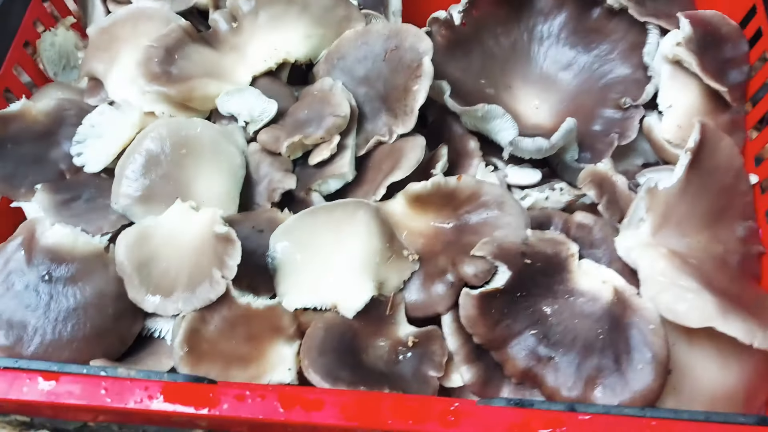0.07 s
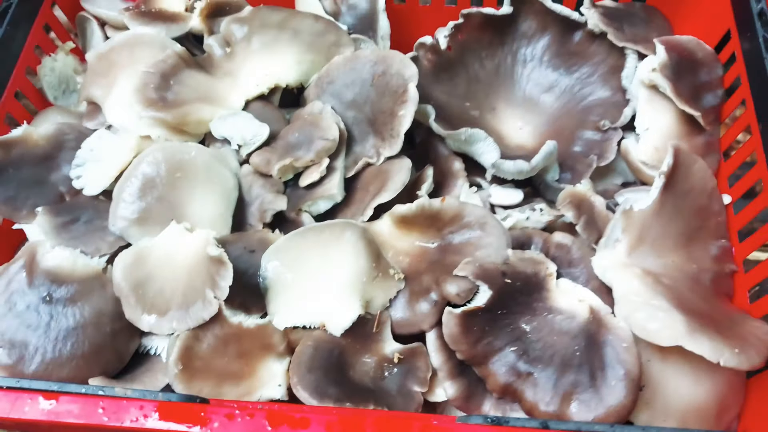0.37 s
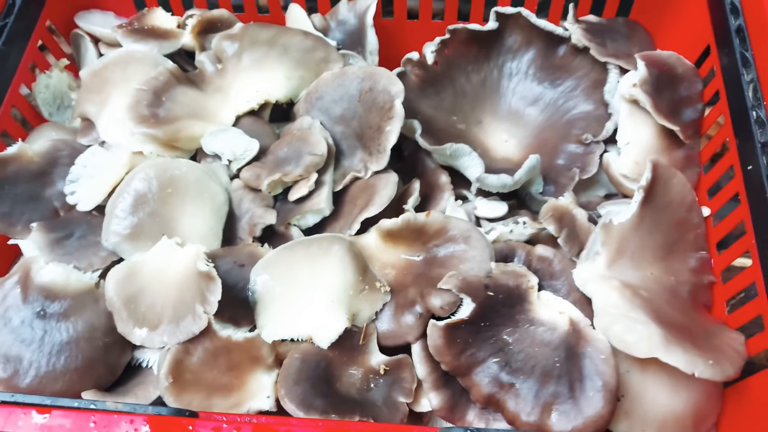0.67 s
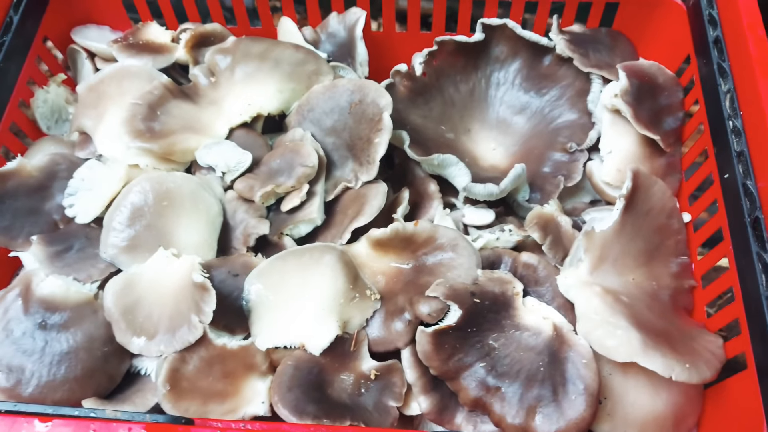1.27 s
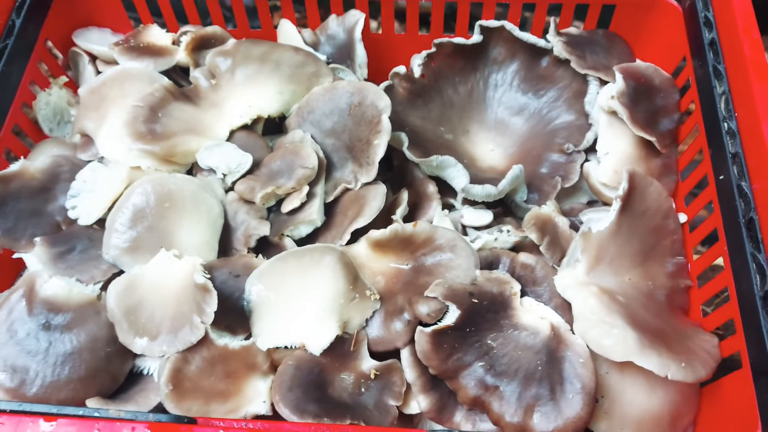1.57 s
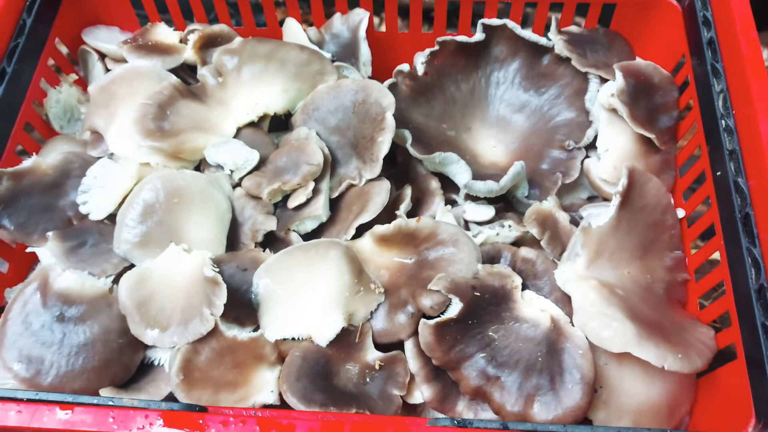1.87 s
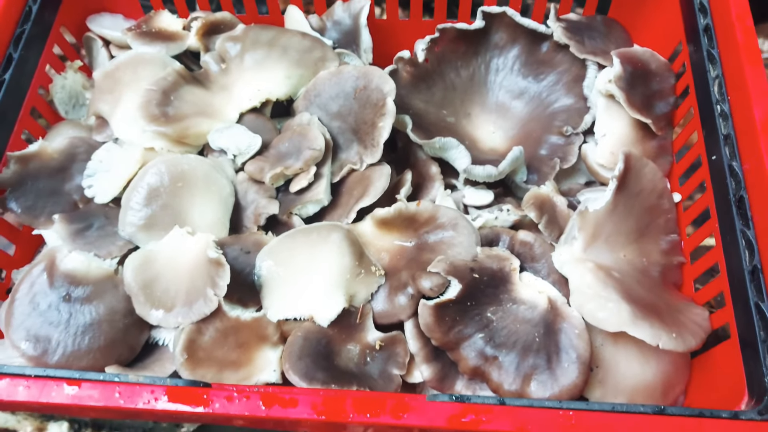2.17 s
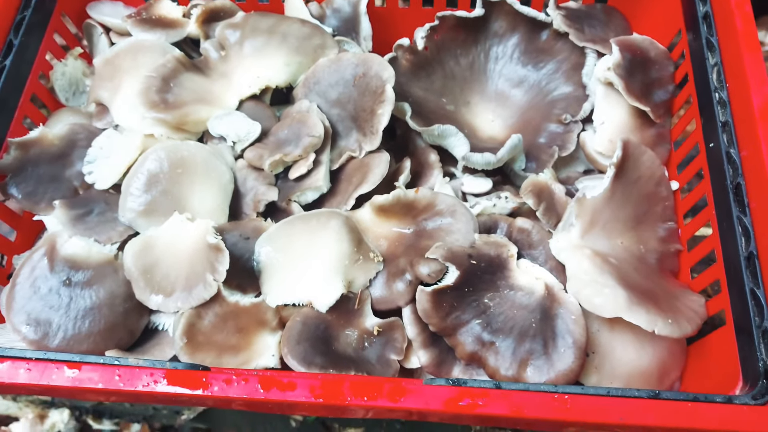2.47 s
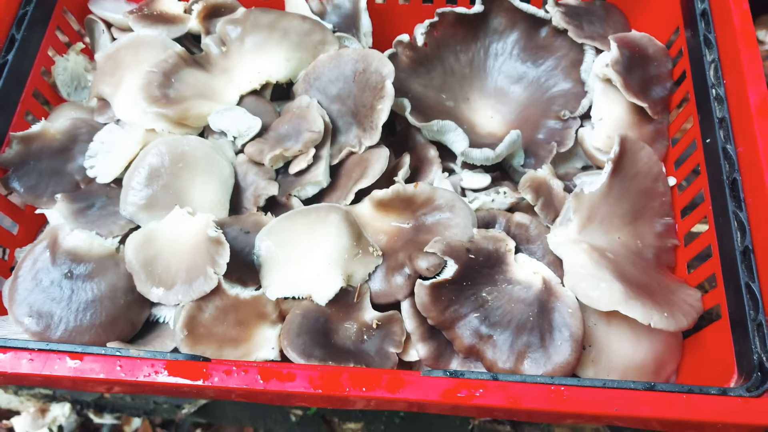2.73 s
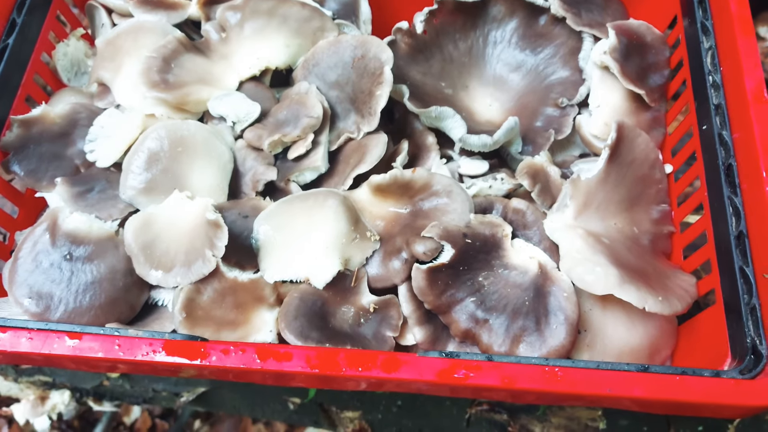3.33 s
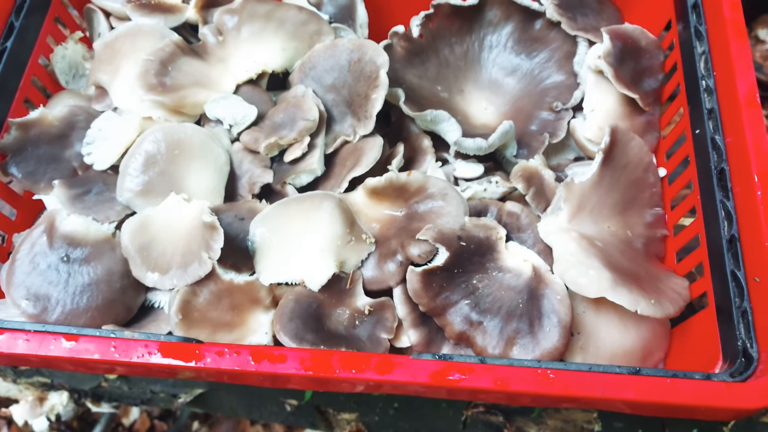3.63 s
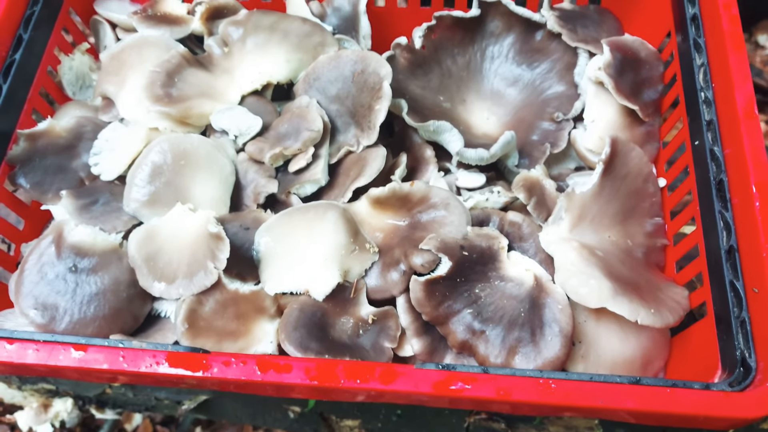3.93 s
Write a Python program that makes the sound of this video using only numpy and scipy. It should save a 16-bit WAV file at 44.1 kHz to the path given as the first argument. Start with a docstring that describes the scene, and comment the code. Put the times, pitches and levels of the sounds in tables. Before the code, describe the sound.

Wind buffeting the microphone over soft light rain, with a few ticks and crate taps.

```python
"""Light rain over a plastic crate

Outdoors, a stereo microphone close over a plastic crate. Countless drops on the leaves all round
merge into a soft hiss, and a breeze buffets both ports with rumble and dull bumps, over a faint
far-off drone. Nearby come sharp ticks on the right, three hollow taps that ring the crate,
faint drips pinging on leaves and, near the end, one short rustle."""
import sys
import numpy as np
from scipy.fft import rfft, irfft, next_fast_len
from scipy.io import wavfile
from scipy.ndimage import uniform_filter1d, map_coordinates

SR = 44100
rng = np.random.default_rng(int(sys.argv[2]) if len(sys.argv) > 2 else 0)


def generate_wav(signal):
    """Clip the signal to [-1, 1] and save it as 16-bit WAV at the path in sys.argv[1]."""
    frames = np.transpose(np.atleast_2d(signal))
    scaled = np.clip(frames, -1, 1) * 32767
    pcm = np.round(scaled).astype(np.int16)
    wavfile.write(sys.argv[1], SR, pcm)


N = 4 * SR


def amp(db):
    """Decibels to gain."""
    return 10 ** (np.asarray(db) / 20)


def unit(x):
    """Scale each channel to rms 1."""
    return x / np.sqrt(np.mean(x ** 2, axis=-1, keepdims=True) + 1e-20)


def curve(rows):
    """Join (time_s, value) points into one value per sample."""
    return np.interp(np.arange(N) / SR, *np.transpose(rows))


def wobble(rate):
    """A smooth random curve with rate knots a second."""
    knots = rng.standard_normal(int(N * rate / SR) + 4)
    return map_coordinates(knots, [np.arange(N) * rate / SR])


def filtered(x, response):
    """Filter x by response(hz)."""
    n = x.shape[-1]
    padded = next_fast_len(n + 8192)
    return irfft(rfft(x, padded) * response(np.fft.rfftfreq(padded, 1 / SR)), padded)[..., :n]


def coloured(x, spectrum):
    """Shape x by (frequency_hz, gain_db) points and scale to rms 1."""
    freqs, db = np.transpose(spectrum)
    return unit(filtered(x, lambda hz: amp(np.interp(np.log(hz + 1), np.log(freqs + 1), db))))


def fade(t, t60):
    """Exponential decay, 60 dB in t60 seconds."""
    return amp(-60 * t / t60)


def add(out, start_s, sound):
    """Mix a sound in at start_s."""
    part = out[..., round(start_s * SR):][..., :sound.shape[-1]]
    part += sound[..., :part.shape[-1]]


def breeze():
    """Each port rumbles with its own gusts; the stronger the gust, the more small eddies."""
    # gust strength at each port: time_s, level_db
    gust_left = [(0.0, -39.5), (0.12, -29.5), (0.4, -44), (0.48, -36), (0.68, -48.5), (0.84, -42),
                 (1.14, -41), (1.22, -44), (1.42, -44), (1.8, -52), (2.02, -46.5), (2.08, -55),
                 (2.28, -43.5), (2.62, -47.5), (2.66, -68), (2.8, -43), (3.04, -46.5), (3.2, -35),
                 (3.26, -49), (3.38, -39), (3.64, -46), (3.99, -39)]
    gust_right = [(0.0, -35), (0.24, -29.5), (0.38, -40.5), (0.52, -32.5), (0.58, -45), (0.72, -37),
                  (0.82, -48.5), (0.88, -38), (0.93, -47.5), (0.97, -34.5), (1.4, -41.5), (1.6, -37.5),
                  (1.64, -50), (1.68, -53), (1.74, -31.5), (1.81, -49), (2.04, -40), (2.095, -53),
                  (2.12, -30), (2.24, -35), (2.265, -42), (2.285, -31.5), (2.42, -37.5), (2.54, -54),
                  (2.6, -36), (2.7, -46.5), (2.74, -33.5), (2.86, -48), (2.9, -36.5), (3.0, -40.5),
                  (3.08, -34), (3.14, -34.5), (3.34, -32), (3.74, -44.5), (3.82, -35), (3.99, -39)]
    # buffeting spectrum: frequency_hz, gain_db
    buffet = [(18, -22), (28, -48), (45, -4.5), (68, 3), (100, -4), (135, -10), (190, -18.5), (240, -27.5),
              (290, -24), (400, -41.5), (700, -54), (1200, -120)]
    eddy_hz, eddy_exponent = 184, 1.35
    gust = amp([curve(gust_left), curve(gust_right)])
    gust_rms = np.sqrt(np.mean(gust ** 2, axis=1, keepdims=True))
    air = coloured(rng.standard_normal((2, N)) + 0.018 * rng.standard_normal(N), buffet)
    power = np.abs(uniform_filter1d(air ** 2, size=2200, axis=-1))
    air = air / np.sqrt(power + 1e-6)  # evened out, so the gusts set the level
    low = filtered(air, lambda hz: 1 / (1 + (hz / eddy_hz) ** 6))
    flutter = amp(0.61 * np.array([wobble(59), wobble(45)]))
    eddies = unit(gust ** eddy_exponent * flutter) * gust_rms  # swing wider than the gusts
    return amp(2) * gust * low + amp([[4], [-3]]) * eddies * (air - low)


def drone():
    """A faint, steady low background from far away."""
    # distant background: frequency_hz, gain_db
    spectrum = [(150, -2.5), (230, -6.5), (285, -1.5), (340, -5.5), (480, -10.5), (650, -12.5), (1000, -67)]
    noise = rng.standard_normal((2, N)) + rng.standard_normal(N)
    return amp(-58.5) * coloured(noise, spectrum + [(2000, -120)])


def rain():
    """Countless far drops merge into hiss; nearer ones add a fine patter."""
    # rain strength: time_s, level_db
    strength = [(0.0, -57.5), (0.22, -57.5), (0.42, -58), (0.7, -58.5), (0.8, -59), (1.1, -57.5),
                (1.4, -58.5), (1.6, -57), (1.67, -59.5), (2.05, -59.5), (2.2, -58), (2.46, -58),
                (2.58, -60), (2.86, -58), (3.0, -59.5), (3.42, -57), (3.5, -58.5), (3.99, -58)]
    # hiss at each port: frequency_hz, gain_db
    hiss_left = [(200, -7), (700, 0.4), (1200, -1.5), (2500, -3), (4200, -5), (6000, -20.5), (7400, -31.5),
                 (9000, -31), (11000, -22), (14200, -23.5), (15500, -26.5)]
    hiss_right = [(200, -11), (780, -2), (1100, -1), (2200, -3.5), (3600, -2), (4200, -1), (5000, -4),
                  (8000, -6.5), (9300, -22.5), (11500, -17), (14200, -20), (15500, -43)]
    # likeness of the two ports: frequency_hz, shared_power_fraction
    likeness = [(500, 0.079), (1500, 0.54), (4000, 0.066), (14000, 0.11)]
    drops_per_s, left_lag_s = 260, 0.000444
    # three streams: left only, right only, both ports
    drops = (rng.random((3, N)) < drops_per_s / SR) * rng.choice([-1, 1], (3, N))
    sizes = amp(3 * np.minimum(rng.exponential(size=(3, N)), 4))
    hiss = rng.standard_normal((3, N)) + amp(-10) * unit(drops * sizes)
    alike = lambda hz: np.interp(hz, *np.transpose(likeness))
    delay = lambda hz: np.exp(-2j * np.pi * np.outer([left_lag_s, 0], hz))
    shared = filtered(hiss[2], lambda hz: np.sqrt(alike(hz)) * delay(hz))
    left, right = shared + filtered(hiss[:2], lambda hz: np.sqrt(1 - alike(hz)))
    pair = np.array([amp(2.5) * coloured(left, hiss_left), amp(2) * coloured(right, hiss_right)])
    return amp(curve(strength) + 0.73 * wobble(24.04)) * pair


def leaf_wash():
    """The middle of the hiss on the leaves, around 2 kHz, swells and ebbs by itself."""
    # swell of the band: time_s, level_db
    swell = [(0.0, -67.5), (0.3, -65), (0.55, -67), (0.7, -65), (0.85, -78), (1.7, -68.5), (2.2, -66.5),
             (3.0, -70), (3.99, -73)]
    # shape of the band: frequency_hz, gain_db
    spectrum = [(1200, -31), (1900, 4), (2500, 0.5), (3400, -13), (7000, -60)]
    return amp(curve(swell)) * coloured(rng.standard_normal((2, N)), spectrum)


def puffs():
    """An eddy hits one port harder than the other: a dull bump of a cycle or two."""
    # single eddies: time_s, level_db, left_minus_right_db
    hits = [(.066, -25.5, -21), (0.111, -26.5, 7), (0.132, -25, 8), (0.212, -29.5, 2), (0.292, -26, 10),
            (0.5, -26, -11), (.818, -30, 23), (0.973, -25.5, -38), (1.01, -26.5, -16), (1.128, -29, -9),
            (1.249, -30.5, -35), (1.308, -31.5, -11), (1.483, -28.5, -17), (1.53, -28.5, -23),
            (1.694, -25.5, -17), (1.73, -29, -30), (2.116, -28, -22), (2.131, -24, -21), (2.165, -28, -25),
            (2.218, -25, -24), (2.334, -27.5, -32), (2.347, -28, -4), (2.411, -28.5, -4),
            (2.732, -28.5, -10), (2.9, -28.5, -12), (3.087, -24.5, -2.5), (3.263, -28, -23),
            (3.331, -22.5, -16), (3.415, -28, -4), (3.465, -29.5, 2), (3.507, -27, -25), (3.571, -29.5, 2),
            (3.826, -31.5, -3), (3.938, -28, -7)]
    # a typical puff: frequency_hz, gain_db
    spectrum = [(25, -28), (60, 1.5), (108, 14.5), (170, -9), (290, -18), (420, -40.5), (700, -50),
                (1300, -120)]
    rise_s, lead_s = 0.0082, 0.00576
    typical_db, octaves_per_db = -26, 0.1128
    n = SR // 10
    out, t = np.zeros((2, N)), np.arange(n) / SR
    bump = (t / rise_s * np.exp(1 - t / rise_s)) ** 2
    for time_s, db, balance_db in hits:
        stretch = 2 ** (octaves_per_db * (db - typical_db))  # harder puffs reach higher
        air = coloured(rng.standard_normal((2, 2 * n)), [(hz * stretch, gain) for hz, gain in spectrum])
        puff = unit(air[:, n // 2:n // 2 + n] * bump) * np.sqrt(np.mean(bump ** 2))
        ports = amp([[min(balance_db, 0)], [min(-balance_db, 0)]])
        add(out, time_s - lead_s, amp(db) * ports * puff)
    return out


def ticks():
    """Tiny bright snaps and softer splashes close to the right port, each with a tail of spray."""
    # snaps: start_s, level_db, pitch_hz, width_octaves, notch_depth_db, t60_s, tail_db
    snaps = [(0.1, -45, 7000, .9, 12, .0016, -18), (.186, -42, 6500, .9, 12, .0016, -24),
             (.447, -44, 8000, .9, 10, .0016, -22), (.885, -39, 4300, 1.3, 7, 0.0064, -16),
             (0.8952, -43, 5500, .9, 11, .003, -7.5), (1.041, -40, 6300, 0.4, 21, 0.0014, -22),
             (1.135, -34.5, 6000, 0.97, 24, .0016, -25), (1.227, -43, 11500, 0.99, 7, .0016, -27),
             (1.2287, -49, 11000, .9, 16, .0016, -27), (1.2441, -29.5, 11000, 0.79, 4, 0.0018, -33),
             (1.823, -36, 6040, 0.7, 15, 0.0018, -22), (2.868, -42, 8000, .9, 12, .0016, -24)]
    notch_hz, notch_width_hz, top_hz = 9750, 850, 14000
    tail_t60_s, left_db = 0.055, -25
    out, t = np.zeros((2, N)), np.arange(SR // 10) / SR
    for start_s, db, pitch_hz, octaves, notch_db, t60, tail_db in snaps:
        decay = fade(t, t60) + amp(tail_db) * fade(t, tail_t60_s)
        band = lambda hz: np.exp(-.5 * (np.log2((hz + 1) / pitch_hz) / octaves) ** 2)
        notch = lambda hz: amp(-notch_db * np.exp(-.5 * ((hz - notch_hz) / notch_width_hz) ** 2))
        burst = rng.standard_normal((2, len(t))) * decay
        snap = filtered(burst, lambda hz: band(hz) * notch(hz) / (1 + (hz / top_hz) ** 10))
        add(out, start_s, amp(db) * unit(snap) * np.sqrt(np.mean(decay ** 2)))
    return out * amp([[left_db], [0]])


def crate_taps():
    """Each tap on the crate below the microphone rings damped plastic modes under a soft crack."""
    # hollow taps: start_s, level_db, pitch_hz, ring_time_factor
    taps = [(.5455, -38, 1020, 1), (.6995, -48.5, 1550, 1), (1.0098, -37, 1300, .55)]
    # modes of the crate: pitch_ratio, level_db, t60_s
    modes = [(.7, -9, .02), (1, -7, 0.034), (1.25, -0.5, 0.011), (1.48, -2, 0.017), (2.4, -19, .02)]
    attack_s, crack_t60_s, left_lag_s = 0.00022, 0.015, 0.00013
    out, t = np.zeros((2, N)), np.arange(SR // 8) / SR
    port_t = np.maximum(t - np.array([[left_lag_s], [0]]), 0)
    for start_s, db, pitch_hz, ring_factor in taps:
        ring = np.zeros_like(port_t)
        for k, (ratio, mode_db, t60) in enumerate(modes):
            tone = (-1) ** k * np.sin(2 * np.pi * pitch_hz * ratio * port_t)
            ring += amp(mode_db) * fade(port_t, ring_factor * t60) * tone
        noise = filtered(rng.standard_normal((2, len(t))), lambda hz: 1 / (1 + (hz / 5500) ** 6))
        crack = amp(-7) * unit(noise) * fade(t, ring_factor * crack_t60_s)
        add(out, start_s, amp(db) * (1 - np.exp(-t / attack_s)) * (ring + crack))
    return out


def drips():
    """Single drops land on nearby leaves, each a faint, short ping."""
    # drops: start_s, level_db, pitch_hz
    drops = [(1.3114, -46, 2330), (1.4227, -47, 2330), (1.5918, -53, 2080), (2.7025, -44.5, 3950),
             (3.417, -44, 2400)]
    attack_s, t60_s, left_db = 0.00012, 0.0061, 2
    out, t = np.zeros(N), np.arange(SR // 20) / SR
    envelope = (1 - np.exp(-t / attack_s)) * fade(t, t60_s)
    for start_s, db, pitch_hz in drops:
        add(out, start_s, amp(db) * envelope * np.sin(2 * np.pi * pitch_hz * t))
    return out * amp([[left_db], [0]])


def rustle():
    """A brief grainy brush, as of leaves, nearby on the right."""
    # overlapping strokes: start_s, level_db, t60_s
    strokes = [(3.536, -55, 0.27), (3.5636, -38.5, 0.02), (3.567, -49.5, 0.31)]
    # colour of the brush: frequency_hz, gain_db
    spectrum = [(600, -10), (1500, 4), (2800, -1), (4000, 6.5), (7500, -2.5), (9300, -20), (15000, -24)]
    attack_s, left_db = 0.00035, -11
    out, t = np.zeros((2, N)), np.arange(SR // 3) / SR
    for start_s, db, t60 in strokes:
        grains = rng.standard_normal((2, len(t))) * amp(1.9 * wobble(400)[:len(t)])
        envelope = (1 - np.exp(-t / attack_s)) * fade(t, t60)
        add(out, start_s, amp(db) * envelope * coloured(grains, spectrum))
    return out * amp([[left_db], [0]])


def scene():
    """Wind on the microphone, the background all round and the small sounds nearby."""
    ambience = breeze() + puffs() + drone() + rain() + leaf_wash()
    return ambience + drips() + ticks() + crate_taps() + rustle()


def record(dry):
    """The recorder keeps nothing above its band limit."""
    return filtered(dry, lambda hz: hz < 15750)


dry = scene()
out = record(dry)
generate_wav(out)
```